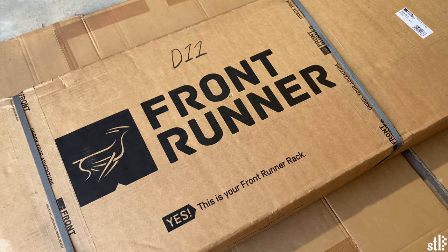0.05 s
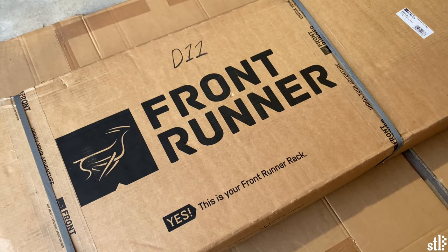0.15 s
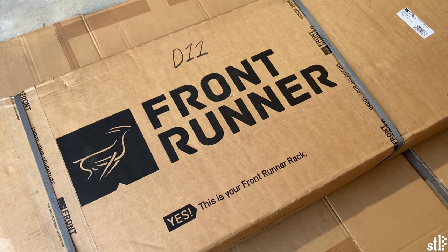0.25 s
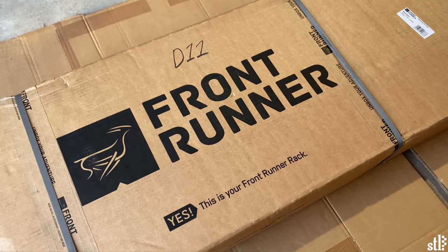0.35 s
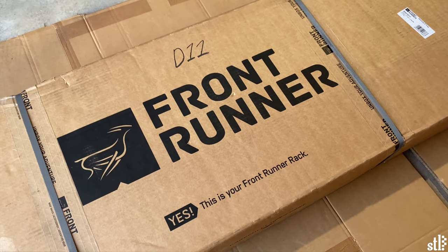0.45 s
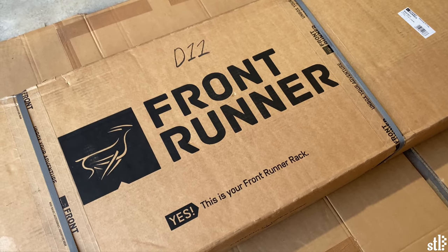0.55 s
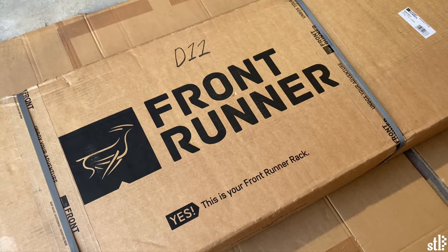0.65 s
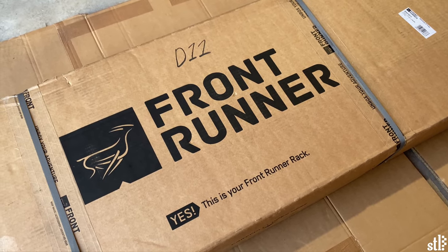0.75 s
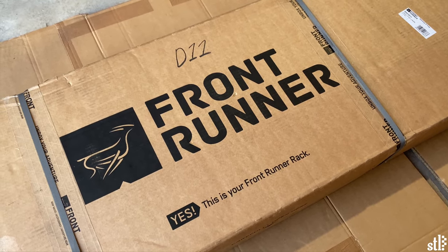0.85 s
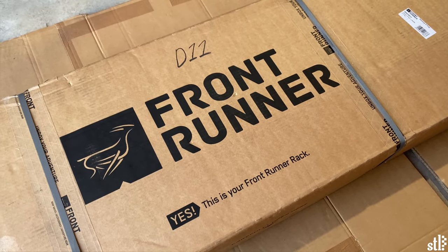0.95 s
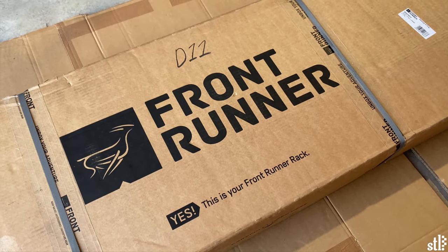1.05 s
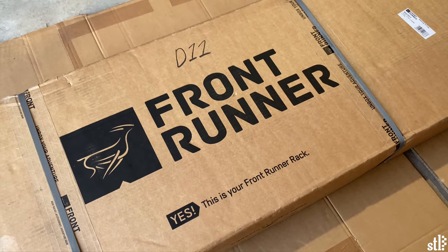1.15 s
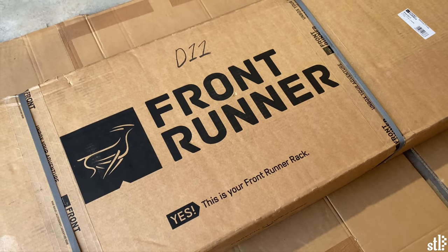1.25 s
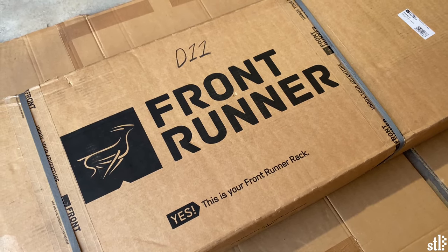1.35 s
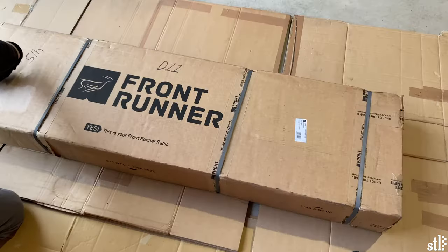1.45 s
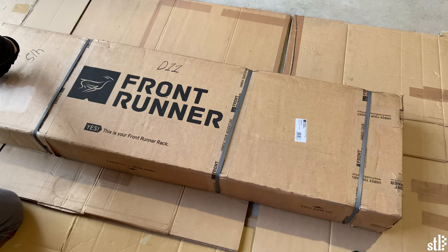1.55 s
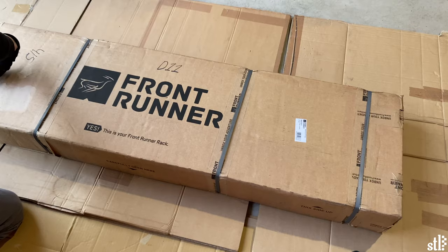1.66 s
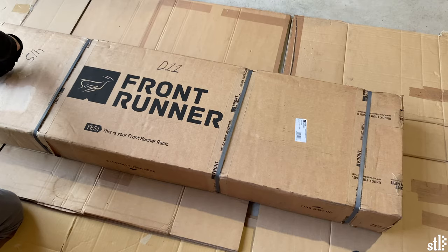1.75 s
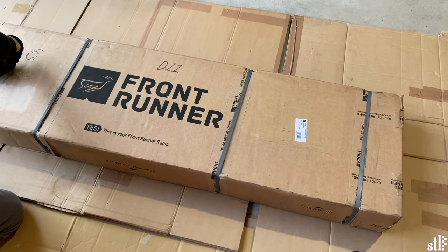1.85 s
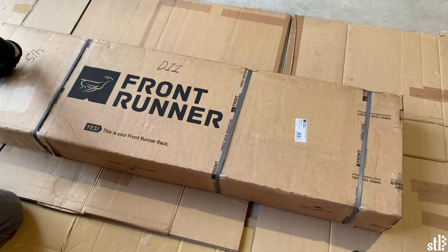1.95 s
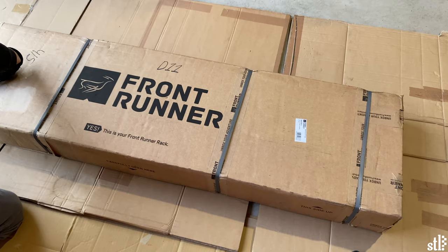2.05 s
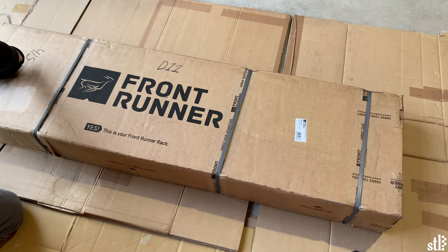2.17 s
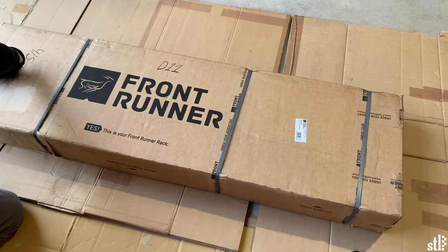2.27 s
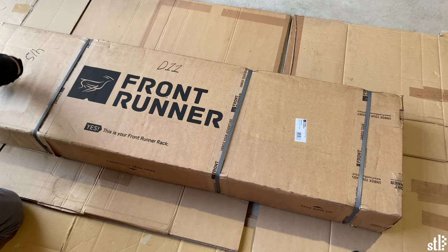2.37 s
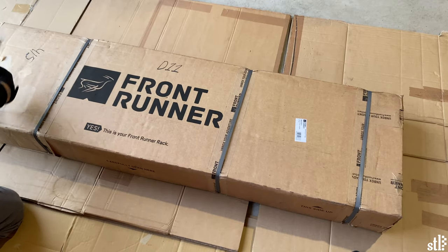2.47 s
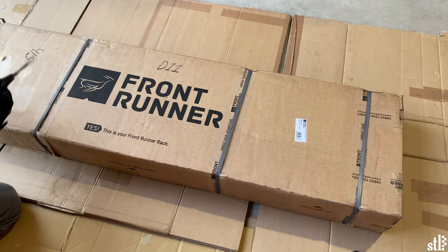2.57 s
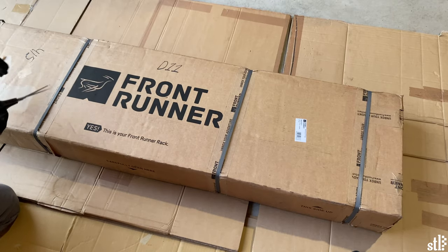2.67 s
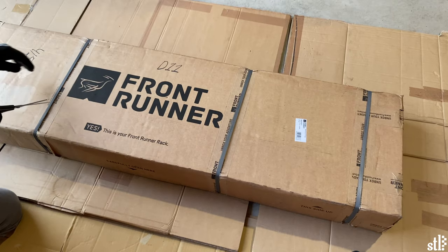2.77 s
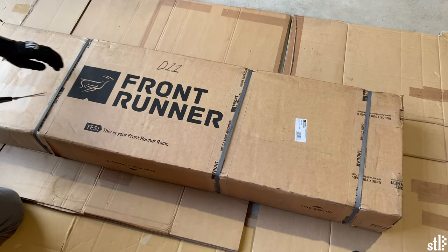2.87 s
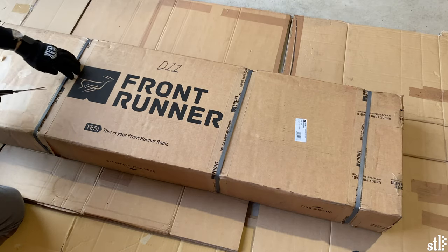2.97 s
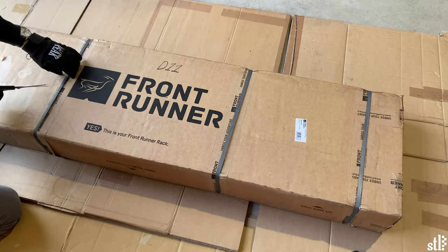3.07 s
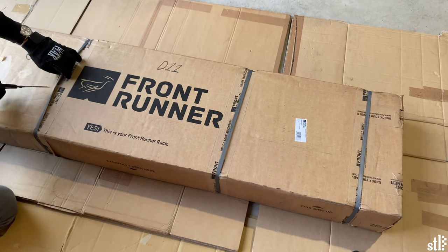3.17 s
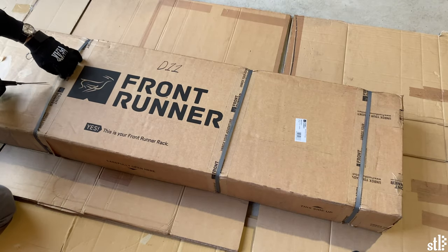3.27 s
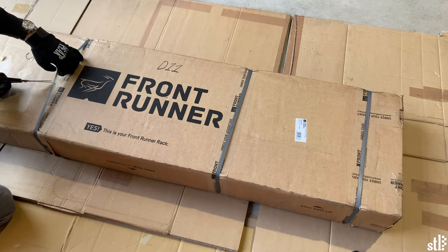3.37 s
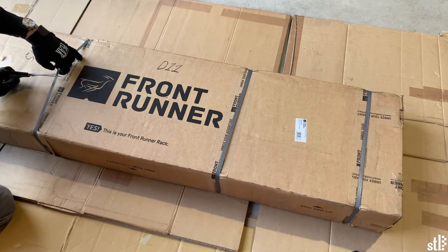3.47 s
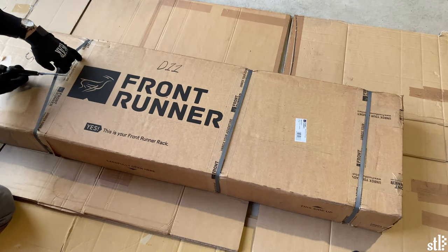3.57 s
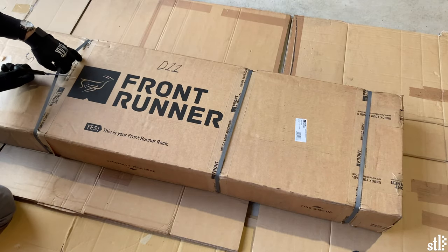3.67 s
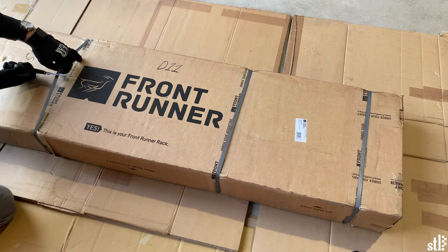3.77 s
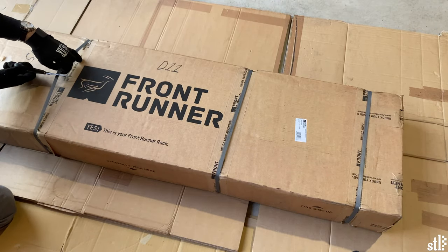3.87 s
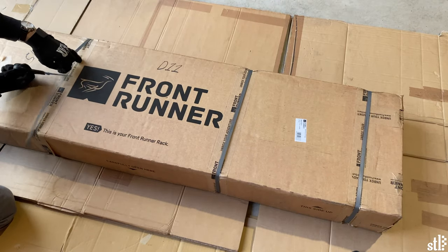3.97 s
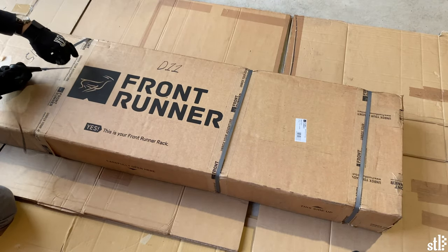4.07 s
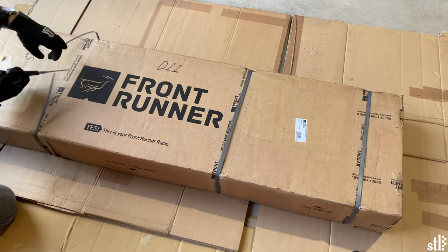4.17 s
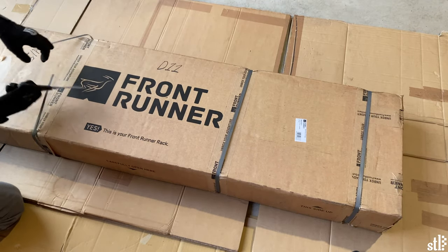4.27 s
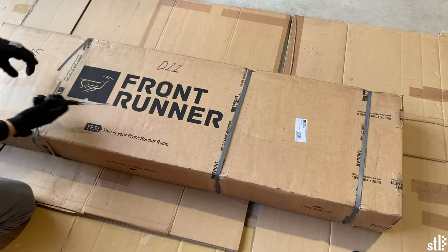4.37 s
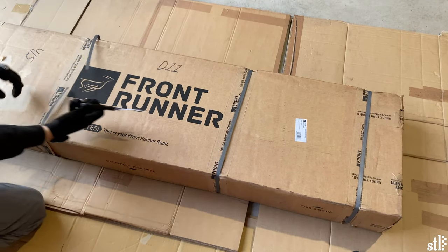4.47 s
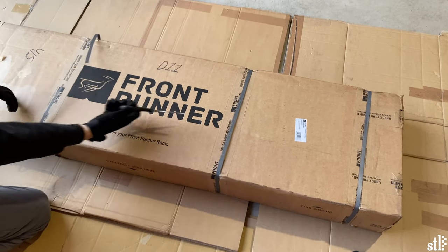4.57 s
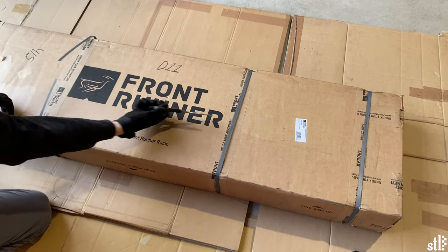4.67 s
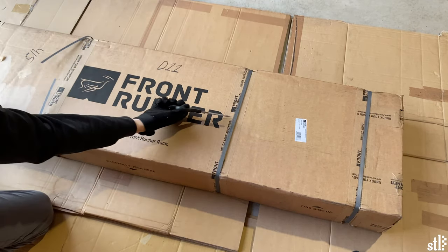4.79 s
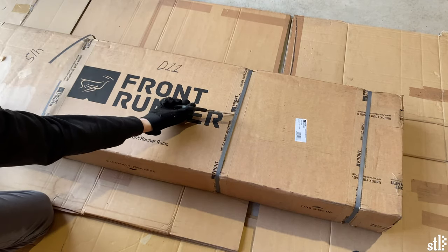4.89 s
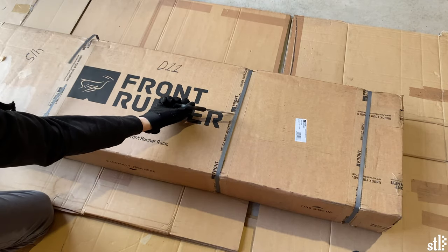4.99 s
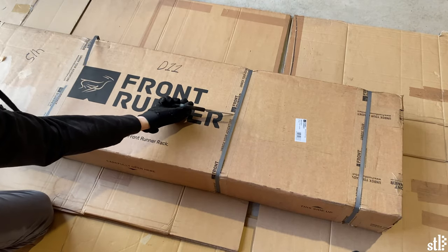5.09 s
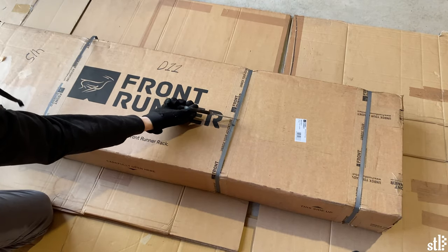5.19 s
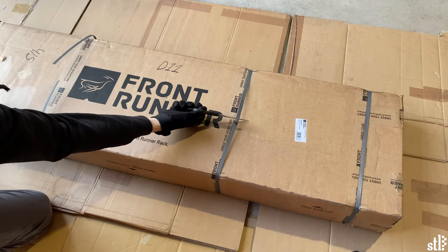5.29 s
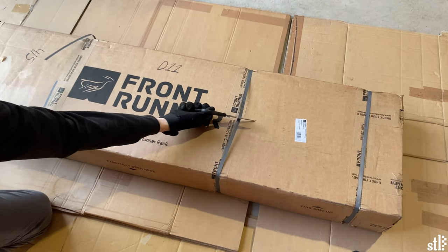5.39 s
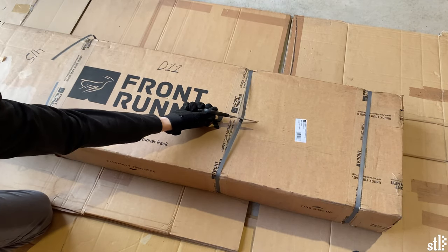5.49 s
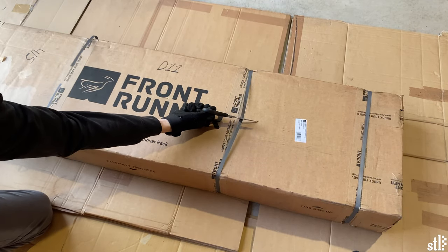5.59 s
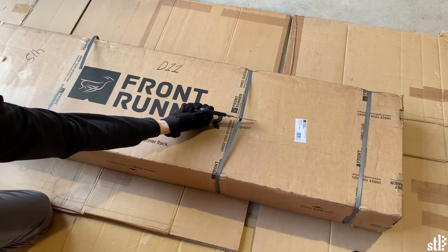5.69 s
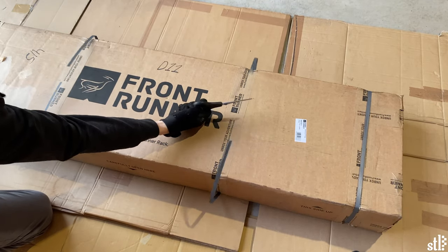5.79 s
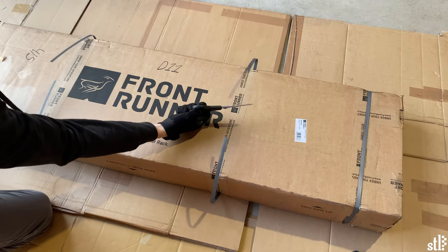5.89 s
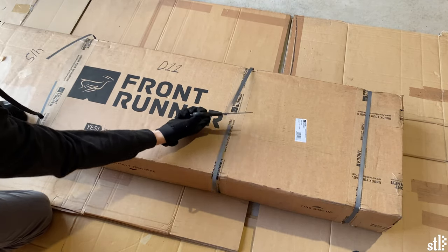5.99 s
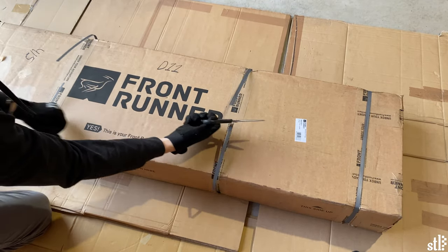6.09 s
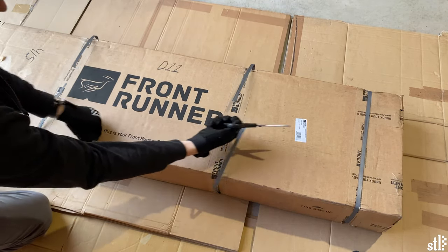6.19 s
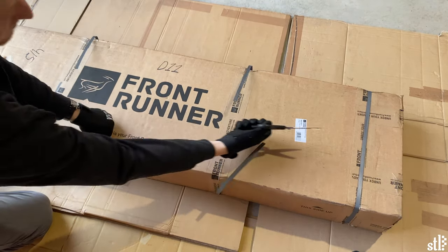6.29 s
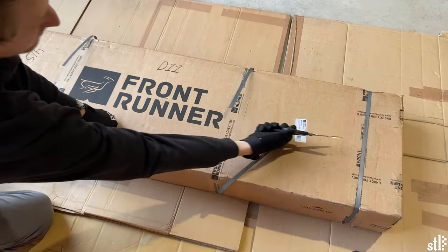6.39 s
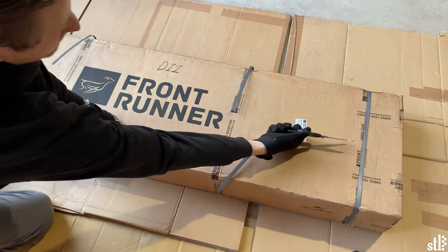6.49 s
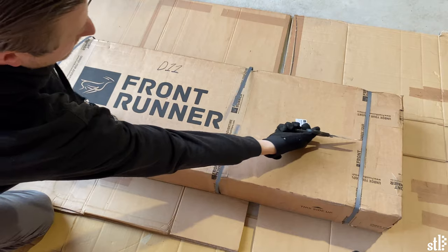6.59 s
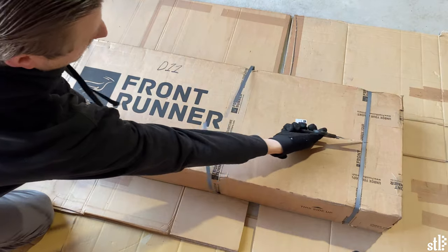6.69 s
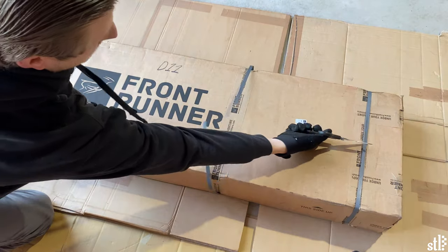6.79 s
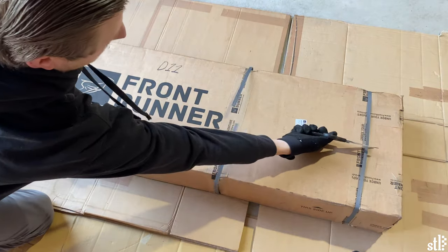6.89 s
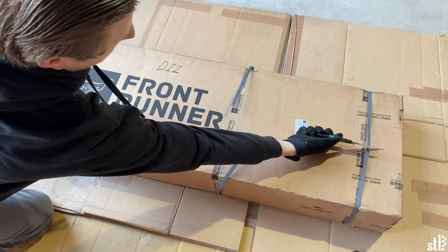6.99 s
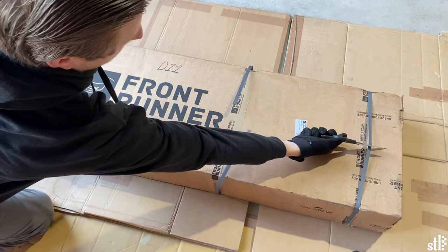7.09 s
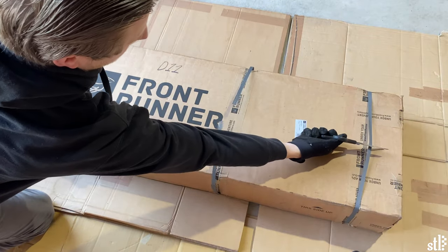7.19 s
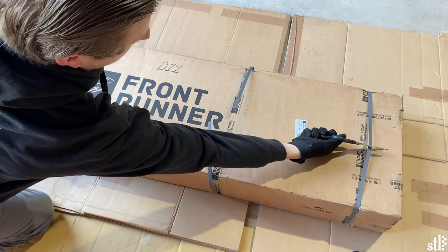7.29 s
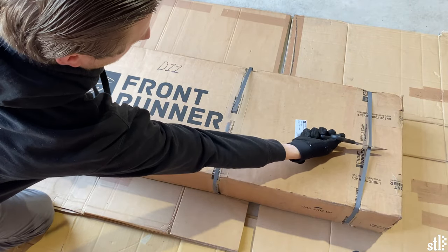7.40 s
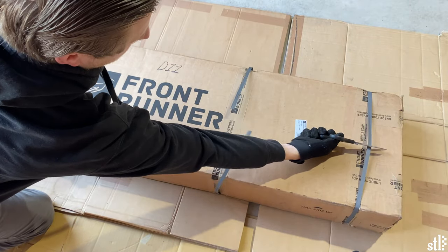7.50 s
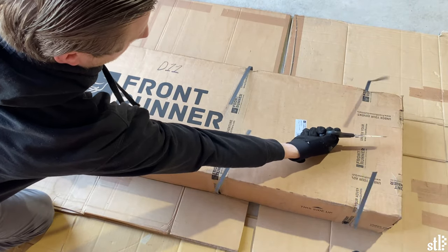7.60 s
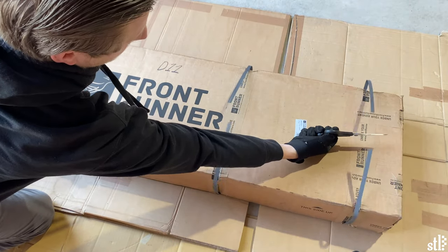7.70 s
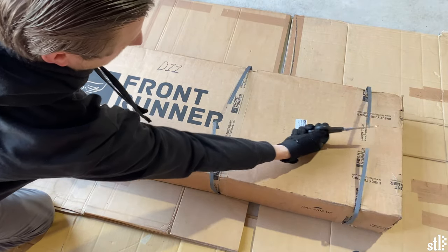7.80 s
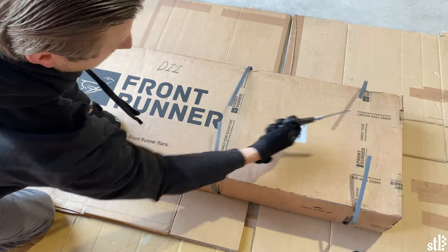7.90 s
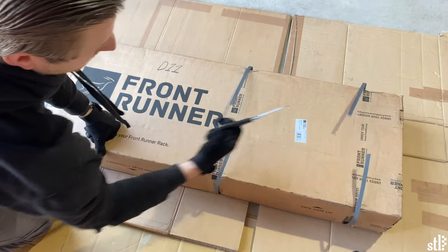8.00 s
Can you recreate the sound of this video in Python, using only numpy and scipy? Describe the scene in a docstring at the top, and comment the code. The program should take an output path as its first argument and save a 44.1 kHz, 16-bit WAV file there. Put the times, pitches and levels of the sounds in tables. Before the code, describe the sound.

For the first 1.4 seconds only a low, slightly wavering workshop hum is heard, with a barely audible whine. Around 1.5 two small hollow pops and soft glove rubbing begin; more muted knocks come near 1.9-2.0. At 2.1 a bright tick leads straight into the first strap cut at 2.17: a dry, loud plastic crack, cardboard thump and short hollow boom, left of centre, with a room tail. Light ticks follow to 2.4. Near 3.1 a brief strap scrape, then gentle leaning rumbles. The second cut at 3.98 is less sharp, with a heavier thud and whipping end; loose ticks follow at 4.2. Quiet sleeve swishes lead to the hardest, brightest crack at 5.74, nearer centre. Cloth rustles at 6.2-6.9, small knocking ticks gather from 7.2, and the fourth snap lands at 7.53, slightly right. Falling-end ticks at 7.8 and faint rubbing finish it.

```python
"""Cutting straps off a box

Four taut plastic straps round a long cardboard box are cut with a knife in a quiet workshop, from left to right.
Each cut is a rasp of noise, a jolt through the card and a ring of the hollow box. Whips are short bright rasps,
ticks are small rasps with a soft knock, and pops are short fading tones.
Gloves and sleeves are shaped noise, and leaning hands shake the box with uneven noise.
The walls answer with fading noise, over a room hum that is all one hears for more than a second at first."""
import sys
import numpy as np
from scipy import signal
from scipy.fft import rfft, irfft, next_fast_len
from scipy.io import wavfile
from scipy.ndimage import uniform_filter1d, map_coordinates

SR = 44100
rng = np.random.default_rng(int(sys.argv[2]) if len(sys.argv) > 2 else 0)


def store_wav(level_fs):
    """Save 16-bit WAV to argv[1]."""
    pcm = np.round(np.clip(np.atleast_2d(level_fs), -1, 1) * 32767)
    wavfile.write(sys.argv[1], SR, pcm.T.astype(np.int16))


N = 355005  # length in samples

# All event levels are settings ahead of the mixing gains; t60 is the time to fade by 60 dB.
# A strap parts: (time [s], crack level [dB], crack t60 [s], tilt [dB per octave], thump level [dB],
# boom level [dB], contact [s], return time of the jolt from the box's edge [s], left over right [dB])
STRAP_CUTS = [(2.165, -1.5, 0.016, 4.5, -9.5, -10.5, 0.00084, 0.0054, 6),
              (3.98, -10.5, 0.022, 2.5, -5, -13, 0.0005, 0.0048, 6.5),
              (5.741, 2, 0.012, 2, -12, -14.5, 0.0039, .0037, 3.5),
              (7.529, -4, 0.017, 3.5, -6.5, -15, 0.0045, .0045, -2)]
# The freed end whips the card: (time [s], level [dB], t60 [s], tilt [dB per octave], left over right [dB])
STRAP_WHIPS = [(2.1716, -24.5, 0.0058, -2.5, -7), (3.9794, -18, 0.006, 9, -6.5),
               (3.9885, -23, 0.0077, 1, -5), (5.7448, -8.5, 0.0065, -1.5, 10.5),
               (7.5328, -18.5, 0.0057, -10.5, 14.5)]
# Slips, slaps and falling strap ends: (time [s], level [dB], knock on the box [dB], tilt [dB per octave])
STRAP_TICKS = [(1.553, -42, -42, 2), (1.846, -45, -47, -7), (2.076, -52, -32, -5), (2.116, -19.5, -39, 4.5),
               (2.123, -31, -28, 8), (2.179, -24.5, -12, -2), (2.329, -38, -57, 3.5), (2.422, -30, -43, 5),
               (2.658, -50, -66, 5.5), (2.967, -40, -51, 6), (3.104, -48, -35, 8), (3.124, -44, -30, 8),
               (3.297, -41.5, -46, 2), (3.46, -46, -50.5, 5), (3.679, -52.5, -45.5, 2.5),
               (3.864, -55, -48, 5), (3.904, -52, -50, 7), (3.918, -57, -37, -7), (3.941, -46, -49, 7),
               (3.957, -42, -24, 6), (4.184, -30.5, -33.5, -0.4), (4.224, -32.5, -48.5, 5),
               (4.396, -52, -74.5, 1), (4.896, -45.5, -47, -3), (5.132, -49, -61, -2),
               (5.165, -48, -57.5, -3), (5.55, -51, -54, 2.5), (5.575, -52.5, -51, 9),
               (5.617, -33.5, -44.5, 7.5), (5.641, -40.5, -36, -5), (5.984, -41, -68, 2.2),
               (6.005, -32, -38.5, 8), (6.035, -37, -39.5, 4), (6.199, -60, -41.5, -6),
               (6.411, -51.5, -55.5, 5), (6.666, -60.5, -31, -11), (7.238, -44.5, -42.5, -0.1),
               (7.254, -40, -44.5, -4), (7.268, -38.5, -31, -2), (7.301, -44, -28.5, 1.2),
               (7.349, -49, -27.5, 6), (7.389, -42, -23.5, 2.5), (7.435, -40, -32, 6),
               (7.442, -42, -27.5, 4.5), (7.611, -40, -29, -3), (7.679, -39.5, -40, -2),
               (7.78, -32.5, -36, 7), (7.787, -33.5, -44, -0.5), (7.794, -39, -49, 4)]
# Short hollow knocks with a pitch: (time [s], pitch [Hz], level [dB], t60 [s])
HOLLOW_POPS = [(1.527, 1020, -25, 0.055), (1.548, 1304, -27, 0.042), (1.922, 760, -32, 0.082),
               (1.945, 744, -36, 0.08), (2.025, 870, -38.5, 0.048), (3.6, 738, -49.5, 0.1),
               (3.63, 697, -52.5, 0.11)]
# Ringing notes of the hollow box: (frequency [Hz], level [dB], t60 [s])
BOX_MODES = [(109.6, 1.5, 0.23), (159.9, 4.5, 0.15), (194, 3, 0.11), (239, -2, 0.057), (285.4, -3, 0.1),
             (338.7, -1.5, 0.15), (398, -18.5, 0.037), (520, -8.5, 0.043), (670, -5, 0.043),
             (750, -5, 0.02), (828, -7.5, 0.079), (1065, 0.5, 0.06), (1340, 1, .05)]
# Colour of snapping strap: (frequency [Hz], level [dB])
CRACK_COLOUR = [(240, -54.5), (400, 8.5), (1390, 6.5), (2810, -3.5), (7640, -16), (9070, -25),
                (12000, -19.5), (15400, -32), (16700, -53.5)]
# Colour of the whipping end: (frequency [Hz], level [dB])
WHIP_COLOUR = [(2000, -40), (5000, -14), (7500, -5), (11000, 0), (16000, -3)]
# Colour of the jolt in the card: (frequency [Hz], level [dB])
THUMP_COLOUR = [(40, -54.5), (90, -21.5), (160, -3.5), (300, 4.5), (700, -12.5), (1500, -23.5), (4000, -47)]
# Gloves and sleeves slide: (start of full strength [s], hold [s], rise [s], fall [s],
# cloth swish [dB], strap scrape [dB], drag on the card [dB])
HAND_SLIDES = [(1.424, 0.046, 0.0079, .3, -65, -67, -70.5), (1.53, .01, .06, .2, -68, -62.5, -58),
               (1.858, 0.021, 0.031, 0.096, -63, -53.5, -54),
               (1.902, 0.15, 0.031, .05, -60.5, -61.5, -63.5), (2.08, .005, .02, 0.042, -52.5, -52, -51),
               (2.5, 0.46, .05, 0.043, -68, -66, -67.5), (2.598, .01, 0.077, 0.077, -61, -66, -75),
               (2.966, 0.15, .02, .05, -69, -63.5, -64), (3.105, 0.013, 0.059, .02, -48, -47, -50.5),
               (3.124, 0.0055, 0.011, .015, -58, -39, -52), (3.136, 0.0092, .015, 0.096, -55, -44.5, -48),
               (3.193, 0.48, .03, 0.19, -62.5, -63, -66), (3.964, 0.025, 0.25, .03, -68, -62, -62),
               (4.247, 0.028, 0.045, 0.096, -56, -58, -65.5), (4.47, 0.022, 0.037, 0.32, -63, -63.5, -63.5),
               (4.652, 0.096, 0.14, 0.6, -65, -65, -66.5), (5.131, 0.035, 0.061, 0.027, -78, -81, -63.5),
               (5.18, 0.24, .13, 0.16, -54.5, -62.5, -60), (5.614, 0.044, 0.033, 0.12, -66, -58, -55),
               (6.057, .01, .03, 0.21, -79.5, -71.5, -65), (6.196, 0.08, 0.029, 0.21, -56, -65.5, -66.5),
               (6.385, 0.033, 0.043, .03, -64.5, -74.5, -66.5),
               (6.437, 0.15, .03, 0.31, -56.5, -69.5, -63.5), (6.59, 0.035, 0.12, 0.19, -63, -80, -63.5),
               (6.892, .08, 0.64, 0.28, -57.5, -67, -59.5), (7.0, .1, .05, .09, -65.5, -65.5, -65),
               (7.834, 0.0091, .03, 0.065, -64, -75, -58), (7.86, 0.18, 0.026, 0.047, -79.5, -83, -66.5)]
# Colour of rubbing cloth: (frequency [Hz], level [dB])
CLOTH_COLOUR = [(2940, -40), (5000, -10.5), (11700, -4.5), (13300, -9.5), (15200, -8.5), (16500, -28)]
# Colour of the scraped strap: (frequency [Hz], level [dB])
SCRAPE_COLOUR = [(1500, -40), (2800, -13), (3500, -4), (4600, -3), (5800, -11.5), (8000, -16),
                 (12000, -80.5)]
# Colour of gloves on card: (frequency [Hz], level [dB])
CARD_COLOUR = [(180, -26.5), (300, -1), (562, -7), (1010, -8), (1240, -11), (2350, -12.5), (4000, -24),
               (5200, -28.5), (8800, -120)]
# How alike left and right rubbing are: (frequency [Hz], likeness [clipped to -1..1])
RUB_LIKENESS = [(60, 0.17), (240, -1.2), (950, 0.18), (3770, 0.22), (15000, -0.77)]
# Weight comes down on the box: (time [s], hold [s], deep give [dB], drumming [dB])
HAND_PUSHES = [(1.561, .01, -41.5, -42.5), (1.871, 0.018, -50, -48.5), (1.925, .03, -49, -51),
               (1.972, 0.0091, -46, -51), (2.07, 0.04, -55, -41.5), (2.617, 0.0092, -73, -58.5),
               (2.704, .25, -76, -62.5), (2.991, 0.044, -42.5, -46.5), (3.123, 0.013, -55, -42),
               (3.202, .01, -40.5, -55), (3.277, 0.012, -34, -50), (3.372, .04, -47, -47),
               (3.493, 0.012, -36.5, -70), (3.61, .01, -61, -59), (3.683, 0.028, -44, -52.5),
               (3.876, .04, -52, -47), (3.929, 0.069, -34, -33), (4.195, .08, -39, -60),
               (4.324, .05, -48, -70), (4.467, 0.023, -49, -65), (4.639, .01, -51, -75),
               (4.917, 0.0081, -38, -46), (5.015, 0.023, -38, -58), (5.096, 0.084, -54, -51),
               (5.276, 0.039, -42.5, -62), (5.356, 0.11, -46.5, -56), (5.57, 0.12, -57, -44),
               (6.061, .01, -69, -54), (6.207, 0.038, -39, -51), (6.446, 0.023, -38, -59),
               (6.676, 0.0084, -72.5, -35), (6.726, 0.25, -57, -46.5), (7.063, .05, -68, -51),
               (7.83, 0.036, -73, -53), (7.9, .02, -62, -52.5), (7.992, .03, -70, -60)]
# Where the hands work: (time [s], left ahead of right [ms], left over right [dB])
HAND_PLACE = [(1.4, 0.24, 2.5), (3.9, 0.25, 3.5), (4.7, 0.097, 3.5), (5.7, .05, 1), (6.7, -0.027, 1.2),
              (7.5, -0.086, 2.5)]
# Fading of the nearer wall sound: (frequency [Hz], t60 [s])
WALL_FADING = [(60, .5), (160, 0.77), (420, .3), (1100, 0.37), (2900, 0.42), (7700, 0.33), (15000, 0.24)]
# Colour of the wall sound: (frequency [Hz], level [dB])
WALL_COLOUR = [(60, -17), (300, 5.5), (1500, -1.5), (5000, 0), (15000, 5)]
# How alike left and right wall sound are: (frequency [Hz], likeness [clipped to 0..1])
WALL_LIKENESS = [(60, 1), (250, 0.23), (700, 0.067), (3000, 0.3)]
# Colour of the room's hum: (frequency [Hz], level [dB])
HUM_COLOUR = [(15, -35.5), (25, 1), (70, 0), (123, -6), (270, -22), (516, -23), (560, -21), (911, -17.5),
              (1260, -25.5), (1370, -26), (2410, -45.5), (3430, -46), (12200, -60), (16000, -72)]
# How alike left and right hum are: (frequency [Hz], likeness [clipped to -1..1])
HUM_LIKENESS = [(60, 0.69), (240, 0.68), (950, 0.75), (3800, .15)]
# Faint whines in the hum: (frequency [Hz], level around which it wavers [dB])
HUM_WHINES = [(1373, -80)]
# Narrow dips in the treble: (centre [Hz], width [Hz], depth [dB])
TREBLE_DIPS = [(9220, 770, -15.5), (12900, 1100, -21.5)]

SPREAD_S = 0.008  # how late a bending wave of 100 Hz arrives after a cut
CUT_ROOM_DB = -5.5  # how much of a cut goes to the walls
TICK_T60_S, TICK_PAN_DB, PAN_PER_TILT = 0.038, 2, 0.4  # bright ticks lie further left
PUSH_RISE_S, PUSH_FALL_S = 0.046, 0.053
SPAN_DB = 30  # how far a slide or push climbs in its rise and sinks in its fall
HUM_DB, HUM_LAG = -54, 20  # level before the rumble wavers; samples by which the left side is late
TOP_HZ = 16800  # nothing is left above this


def straps():
    """All strap sounds; four sends let neighbouring events meet the walls differently. Returns direct and room."""
    direct, sends = np.zeros((2, N)), np.zeros((4, N))
    for source in (cuts, whips, ticks, pops):
        source(direct, sends)
    room = sum(walls(send) for send in sends)
    return direct, room


def cuts(direct, sends):
    """A parting strap cracks, its lost pull jolts the card, and the hollow box booms."""
    for k, (s, crack_db, t60, tilt_db, thump_db, boom_db, contact_s, trip_s, pan_db) in enumerate(STRAP_CUTS):
        rasp, click = burst(crackle(tilt_db), crack_db, t60, rise_s=0.0013)
        jolt = thump(thump_db, SPREAD_S, trip_s, keep=0.49, soft_hz=2500)
        ring = boom(boom_db, contact_s, 0.97, SPREAD_S)
        # bass bends round the microphones' housing, so it leans less to one side
        body = (jolt + ring) * sides(0.55 * pan_db)
        add(direct, rasp * sides(pan_db) + body, s)
        add(sends[k], amp(CUT_ROOM_DB) * (click + 0.34 * jolt + 0.2 * ring), s)


def whips(direct, sends):
    """The freed end strikes the card: a very sudden, bright rasp."""
    for k, (s, db, t60, tilt_db, pan_db) in enumerate(STRAP_WHIPS):
        colour = lambda hz: amp(along(WHIP_COLOUR, hz) + tilt_db * np.log2(hz / 10000 + 0.05))
        rasp, click = burst(colour, db, t60, rise_s=0.00014)
        add(direct, rasp * sides(pan_db), s)
        add(sends[k % len(sends)], amp(-15.5) * click, s)


def ticks(direct, sends):
    """Each slip, slap or fall is a small rasp with a soft knock on the box."""
    for k, (s, db, knock_db, tilt_db) in enumerate(STRAP_TICKS):
        pan_db = TICK_PAN_DB + PAN_PER_TILT * tilt_db
        rasp, click = burst(crackle(tilt_db), db, TICK_T60_S, rise_s=0.0022)
        jolt = thump(knock_db, 0.016, 0.0045, keep=0.6, soft_hz=330)
        knock = 0.7 * jolt + 0.7 * boom(knock_db, 0.0035, 1.3, 0.012)
        add(direct, rasp * sides(pan_db) + knock * sides(0.47 * pan_db), s)
        add(sends[k % len(sends)], amp(-5) * (click + 0.62 * knock), s)


def pops(direct, sends):
    """A hollow knock is a fading tone whose phase is shaken by a rough contact."""
    t = np.arange(SR // 4) / SR
    for k, (s, hz, db, t60) in enumerate(HOLLOW_POPS):
        waver = 6 * uniform_filter1d(rng.standard_normal(len(t)), size=120)
        shape = amp(db - 60 * t / t60) * (1 - np.exp(-t / 0.0092))
        pop = shape * np.sin(2 * np.pi * hz * t + waver)
        add(direct, pop, s)
        add(sends[k % len(sends)], amp(-12.5) * pop, s)


def burst(colour, db, t60, rise_s):
    """A dying rasp of plastic, and one click of the same colour and energy that sets off the room."""
    t = np.arange(SR // 4) / SR
    shape = amp(db + 0.5 - 60 * t / max(t60, 0.002)) * (1 - np.exp(-(t / rise_s) ** 2))
    rasp = shape * filtered(rng.standard_normal(len(t)), colour)
    click = filtered(1.0 * (np.arange(len(t)) == 128), colour)
    return [v * np.linalg.norm(shape) / np.linalg.norm(v) for v in (rasp, click)]


def crackle(tilt_db):
    """The colour of snapping strap, tilted about 3 kHz."""
    return lambda hz: amp(along(CRACK_COLOUR, hz) + tilt_db * np.log2(hz / 3000 + 0.035))


def thump(db, spread_s, trip_s, keep, soft_hz):
    """The jolt runs through the card as a bending wave, low notes last, and returns weaker from the edges."""
    late = lambda hz: np.exp(-4j * np.pi * spread_s * np.sqrt(100 * hz))
    again = lambda hz: 1 / (1 - np.clip(keep, 0, 0.85) * np.exp(-2j * np.pi * hz * trip_s))
    colour = lambda hz: amp(along(THUMP_COLOUR, hz)) / (1 + (hz / soft_hz) ** 2)
    impulse = 1.0 * (np.arange(SR // 4) == 0)
    sweep = filtered(impulse, lambda hz: colour(hz) * late(hz) * again(hz))
    return amp(db) * sweep / np.abs(sweep).max()


def boom(db, contact_s, damping, spread_s):
    """The box rings at new strengths; a long contact weakens high modes, and low modes start late."""
    hz, level, t60 = np.transpose(BOX_MODES)[:, :, None]
    t = np.maximum(np.arange(SR // 4) / SR - spread_s * np.sqrt(100 / hz), 0)
    scatter_db = 2 * rng.standard_normal(hz.shape)
    level = level + scatter_db - 10 * np.log10(1 + (hz * contact_s) ** 4)
    sign = (-1) ** np.arange(len(BOX_MODES))[:, None]  # neighbouring modes push opposite ways
    modes = sign * amp(level - 60 * t * damping / t60) * np.sin(2 * np.pi * hz * t)
    ring = modes.sum(axis=0)
    return amp(db) * ring / np.abs(ring).max()


def rubbing():
    """Cloth swishes in fine grains, the strap scrapes in coarser ones, gloves drag most coarsely over the card."""
    s, hold_s, rise_s, fall_s, *levels_db = np.transpose(HAND_SLIDES)
    swishing, scraping, dragging = gestures(s, hold_s, rise_s, fall_s, levels_db)
    flutter_db = 1.2 * wobble(50)  # shared by all three
    swish = unit(amp(flutter_db + 0.82 * wobble(1400)) * rush(CLOTH_COLOUR, RUB_LIKENESS, patchy_db=-3.5))
    scrape = unit(amp(flutter_db + 2.2 * wobble(440)) * rush(SCRAPE_COLOUR, RUB_LIKENESS, patchy_db=2.5))
    drag = amp(flutter_db + 1.3 * wobble(200)) * rush(CARD_COLOUR, RUB_LIKENESS, patchy_db=-0.5)
    # the drag's level counts its left side between 1100 and 3000 Hz
    drag /= np.std(filtered(drag[0], lambda hz: (hz > 1100) & (hz < 3000)))
    return swishing * swish + scraping * scrape + dragging * drag


def leaning():
    """Uneven pushes drive the box's modes and, below them, the give of the whole stack."""
    s, hold_s, *levels_db = np.transpose(HAND_PUSHES)
    giving, drumming = gestures(s, hold_s, PUSH_RISE_S, PUSH_FALL_S, levels_db)
    pushes = amp(3 * wobble(30)) * rng.standard_normal((2, N))
    drum = filtered(pushes[0], lambda hz: box_response(hz) / (1 + (hz / 300) ** 2))
    # the stack gives around 60 Hz
    give = filtered(pushes[1], lambda hz: (1j * hz * 35 / (60 ** 2 - hz * hz + 1j * hz * 35)) ** 2)
    return drumming * unit(drum) + giving * unit(give)


def box_response(hz):
    """The box under steady force: one resonance per mode, narrower the longer it rings."""
    total = 0
    for centre, db, t60 in BOX_MODES:
        loss = 1j * hz * 2.2 / t60
        total = total + amp(db) * loss / (centre * centre - hz * hz + loss) * np.sqrt(t60)
    return total


def gestures(s, hold_s, rise_s, fall_s, levels_db):
    """Rise, hold and fall for each row; one gain curve per level column, rows adding in power."""
    t = np.arange(0, N / SR, 0.002)
    early = np.maximum(s[:, None] - t, 0)
    late = np.maximum(t - (s + np.abs(hold_s))[:, None], 0)
    shape = amp(-SPAN_DB * (early / np.reshape(rise_s, (-1, 1)) + late / np.reshape(fall_s, (-1, 1))))
    return [np.interp(np.arange(N) / SR, t, np.sqrt(amp(db) ** 2 @ shape ** 2)) for db in levels_db]


def delayed(pair):
    """The nearer side hears a sound earlier."""
    shift = curves(HAND_PLACE)[0] * SR / 2000  # half the time difference, in samples
    moved = zip(pair, (shift, -shift))
    return np.array([map_coordinates(c, [np.arange(N) + d], mode="nearest") for c, d in moved])


def walls(x):
    """The workshop's answer is noise: each frequency dies at its own speed; the lowest bass is shared by both sides."""
    hz, t, z = signal.stft(rng.standard_normal((2, SR // 2)), SR, nperseg=256)
    turn = np.arccos(np.clip(along(WALL_LIKENESS, hz), 0, 1))[:, None] / 2
    mid, side = z[0] * np.cos(turn), z[1] * np.sin(turn)
    near_db = -60 * t / along(WALL_FADING, hz)[:, None]
    far_db = -22 + near_db / 2.5  # the far end of the hall lingers
    fade = amp(along(WALL_COLOUR, hz)[:, None]) * np.hypot(amp(near_db), amp(far_db))
    tail = signal.istft(np.array([mid + side, mid - side]) * fade, SR, nperseg=256)[1]
    late = np.pad(x, (140, 0))[None]  # the answer starts 140 samples later
    return signal.oaconvolve(late, tail / np.linalg.norm(tail[0]), axes=1)[:, :N]


def hum():
    """Workshop air with a wavering rumble and faint whines, a little to the right."""
    air = rush(HUM_COLOUR, HUM_LIKENESS, patchy_db=1.0)
    rumble = filtered(air, lambda hz: 1 / (1 + (hz / 150) ** 4))
    left, right = amp(HUM_DB) * (air + rumble * (amp(3 * wobble(9)) - 1))
    whines = np.zeros(N)
    for hz, db in HUM_WHINES:
        strength = np.sqrt(2) * amp(db + 3.7 * wobble(3.2))
        whines += strength * np.sin(2 * np.pi * hz * np.arange(N) / SR)
    return np.array([amp(-0.5) * np.roll(left + whines, HUM_LAG), right + whines])


def rush(spectrum, alike, patchy_db):
    """Stereo noise of rms 1 with patches of random gain."""
    z = signal.stft(rng.standard_normal((2, N)), nperseg=512)[2]
    field = uniform_filter1d(rng.standard_normal(z.shape[1:]), size=6, axis=0)
    field = uniform_filter1d(field, size=8, axis=1)
    pair = signal.istft(z * amp(patchy_db * unit(field)), nperseg=512)[1][:, :N]
    turn = lambda hz: np.arccos(np.clip(along(alike, hz), -1, 1)) / 2
    mid, side = filtered(pair, lambda hz: amp(along(spectrum, hz)) * [np.cos(turn(hz)), np.sin(turn(hz))])
    return unit(np.array([mid + side, mid - side]))


def wobble(rate):
    """A smooth random curve, rate knots a second."""
    return map_coordinates(rng.standard_normal(int(N * rate / SR) + 4), [np.arange(N) * rate / SR])


def filtered(x, response):
    """Passes x through a response given as a function of frequency."""
    n = x.shape[-1]
    m = next_fast_len(n + 8192)
    return irfft(rfft(x, m) * response(np.fft.rfftfreq(m, 1 / SR)), m)[..., :n]


def along(points, hz):
    """Reads a (frequency, value) table on a log axis."""
    f, v = np.transpose(points)
    return np.interp(np.log(hz + 1), np.log(f + 1), v)


def curves(rows):
    """One value per sample for each column after the time."""
    s, *cols = np.transpose(rows)
    return [np.interp(np.arange(N) / SR, s, c) for c in cols]


def add(into, sound, s):
    """Mixes a sound in at s seconds."""
    part = into[..., round(s * SR):][..., :sound.shape[-1]]
    part += sound[..., :part.shape[-1]]


def sides(pan_db):
    """Left and right gains for a left-over-right level in dB."""
    return amp([[pan_db / 2], [-pan_db / 2]])


def amp(db):
    """Gain of a dB value."""
    return 10 ** (np.asarray(db) / 20)


def unit(x):
    """Scaled to rms 1."""
    return x / np.sqrt(np.mean(x ** 2) + 1e-20)


def scene():
    """Work on the box over the hum of the room."""
    direct, room = straps()
    pan_db = curves(HAND_PLACE)[1]
    hands = (leaning() + rubbing()) * amp([pan_db / 2, -pan_db / 2])
    return delayed(direct + hands) + room + hum()


def record(dry):
    """A bass roll-off, two narrow dips in the treble, soft clipping, and nothing above the band limit."""
    dips = lambda hz: amp(sum(db * np.exp(-((hz - c) / w * 2) ** 4) for c, w, db in TREBLE_DIPS))
    low_cut = lambda hz: (1j * hz / (35 + 1j * hz)) ** 2
    x = filtered(dry, lambda hz: dips(hz) * low_cut(hz))
    x = x / (1 + np.abs(x / 0.8) ** 6) ** (1 / 6)  # peaks bend towards 0.8
    return filtered(x, lambda hz: np.clip((TOP_HZ - hz) / 500, 0, 1) ** 2)


dry = scene()
out = record(dry)
store_wav(out)
```